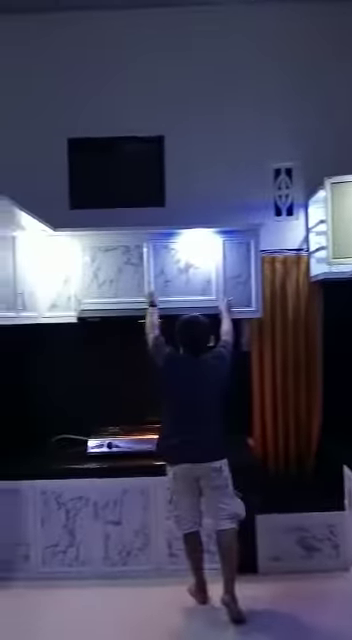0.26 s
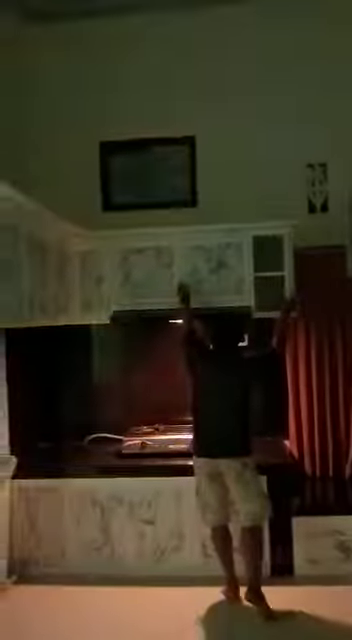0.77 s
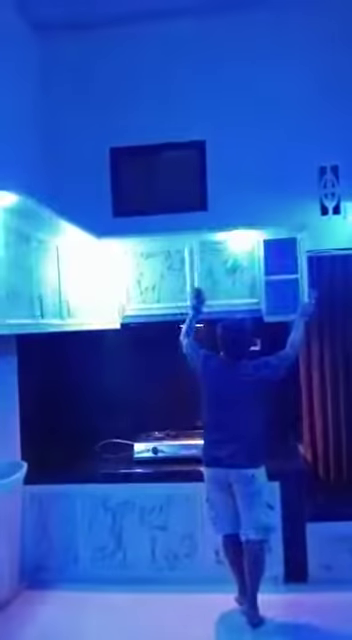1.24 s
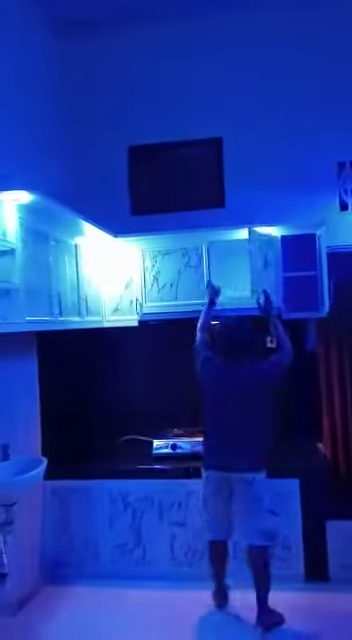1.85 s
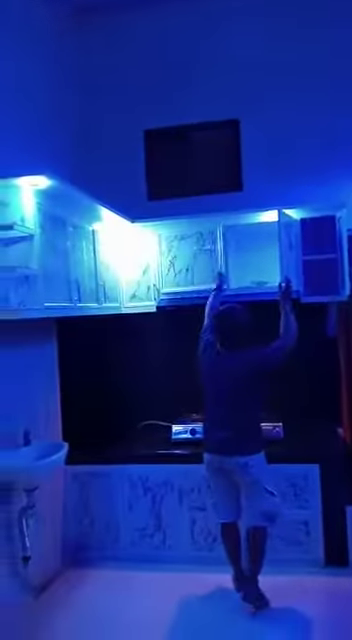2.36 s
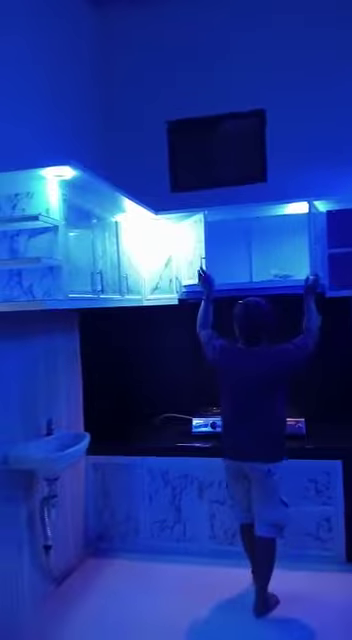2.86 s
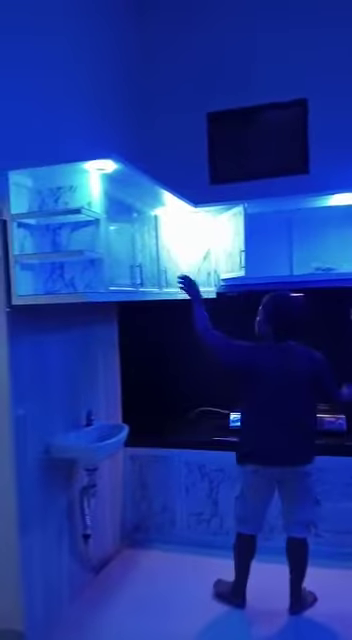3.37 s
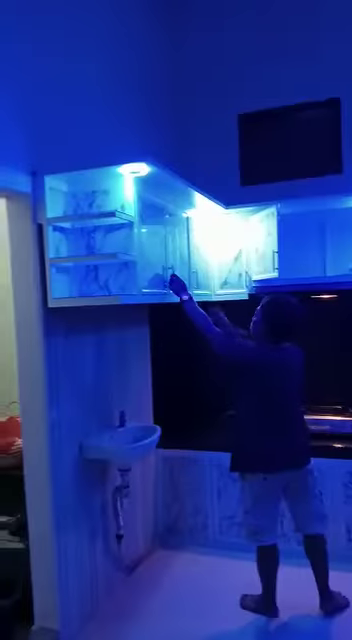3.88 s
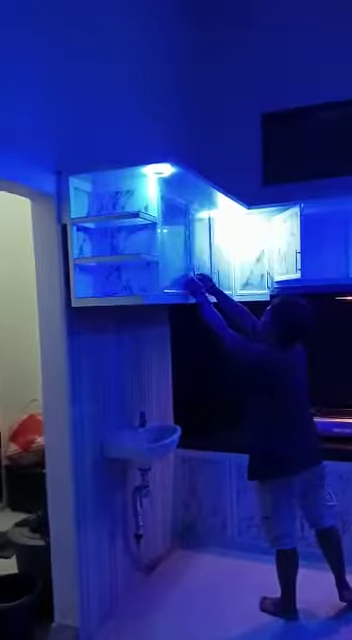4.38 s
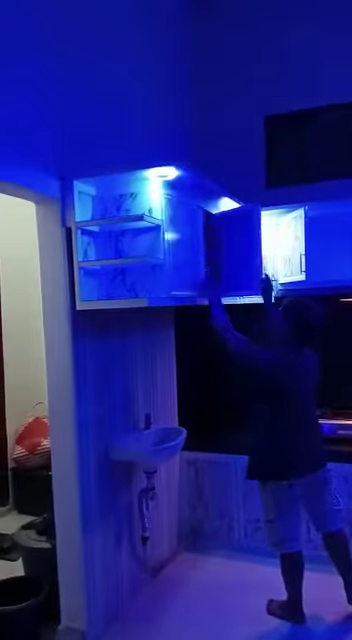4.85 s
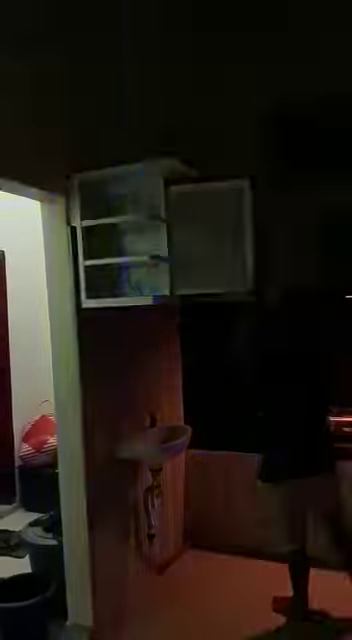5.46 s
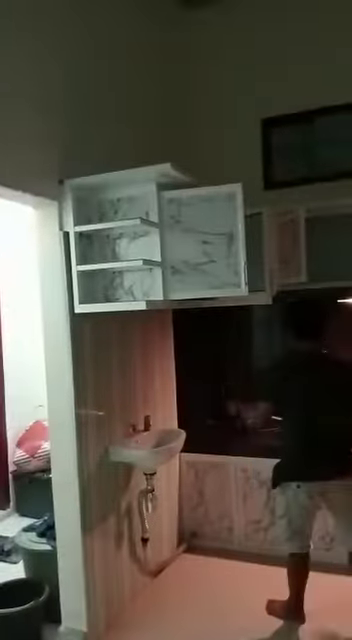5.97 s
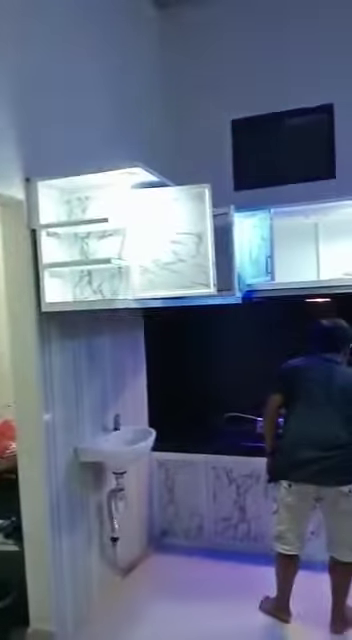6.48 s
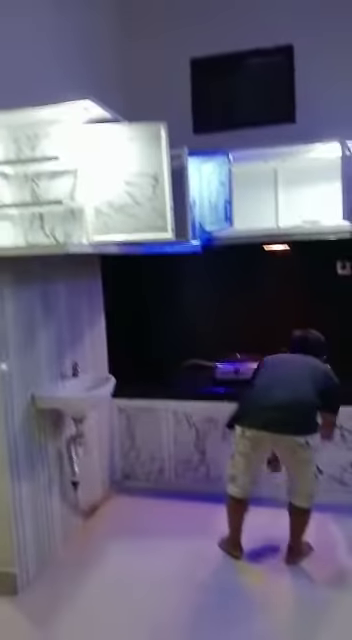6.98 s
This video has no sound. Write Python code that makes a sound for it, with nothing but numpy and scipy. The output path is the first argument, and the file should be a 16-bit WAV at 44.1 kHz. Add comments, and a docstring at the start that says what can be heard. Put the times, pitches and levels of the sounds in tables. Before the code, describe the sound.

A bare, tiled kitchen with about half a second of bright reverberation. Quiet air, a low motor hum, a faint wavering traffic drone and thin, high insect trills run throughout. Hands rub faintly at the start. At 0.48 s a door pops free and jangles, run together with a loud, dry switch snap close to the microphone at 0.53. Another door rattle at 0.98 meets the next, brighter snap at 1.0. Light ticks and a soft bump at 1.9-2.2 lead to a crisp catch pop at 2.37. A tiny tick at 3.4 and cushioned thuds at 3.75 and 3.94 follow. Doors clack and shudder open at 4.5 and, with more jangle, 4.93. Switches snap at 5.59 and, strongest, 6.18, each with a short wall echo. Soft bumps fall at 5.83 and 6.9; from 7.07 a low drawer is tugged, drumming and rasping until the cut.

```python
"""Doors pop off their catches, rattle and knock along a row of metal-framed kitchen cabinets in a bare, tiled room.
Closer to the microphone, wall switches snap the lights off and on; at the end a low drawer starts to slide.
Behind lie a humming motor, room air, a far traffic drone and thin night insects outside.
Knocks, snaps and rubbing are shaped noise, coloured by resonant bodies and blended with the room's answer;
the motor, traffic and insects are wavering sine tones, and the air is filtered noise."""
import sys
import numpy as np
from scipy import signal
from scipy.fft import rfft, irfft, next_fast_len
from scipy.io import wavfile
from scipy.ndimage import uniform_filter1d, map_coordinates

SR = 44100
rng = np.random.default_rng(int(sys.argv[2]) if len(sys.argv) > 2 else 0)


def digitize_waveform(pressure):
    """Quantize a signal to 16-bit integers and store it at the path in sys.argv[1].

    Rows of a 2-D input are taken as channels; values are limited to [-1, 1].
    """
    field = np.atleast_2d(pressure).T
    bounded = np.clip(field, -1, 1)
    quanta = np.round(bounded * 32767).astype(np.int16)
    wavfile.write(sys.argv[1], SR, quanta)


N = 318843
SPAN = 49152  # samples given to one knock or room answer
KNOCK_TIME = np.arange(SPAN) / SR  # [s]
KNOCK_HZ = np.fft.rfftfreq(SPAN, 1 / SR)
CLOCK = np.arange(N) / SR  # [s]
TOP_HZ = 15750  # the recorder's band limit

# Levels in the event tables are relative: trims, room and body filters in the functions also act on them.

# Room air, its broad colour: (frequency [Hz], spectral level [dB])
AIR_COLOUR = [(15, -60), (25, -57), (117, -15.5), (141, -22), (223, -13), (301, -14.5), (416, -16),
              (503, -12.5), (734, -22.5), (988, -21.5), (2910, -28), (3160, -30), (3820, -27), (4740, -29),
              (16000, -39.5)]
# Room air, resonances: (frequency [Hz], width [Hz], lift [dB])
AIR_MODES = [(61, 50, 12), (103, 30, 3.5), (300, 180, 4.1), (550, 42, 2.5), (9200, 1240, 9.3)]
# Steady lines of the motor: (frequency [Hz], middle level [dB])
MOTOR_LINES = [(148, -67), (495, -80)]
LOW_WAVES_DB = 3  # depth of the slow waves in the room's low end

# Far traffic drifting in and out: (start [s], time before the fall [s], middle pitch [Hz], middle level [dB])
TRAFFIC_SWELLS = [(-0.15, 0.37, 261.5, -60.5), (1.77, 0.16, 346, -65), (2.8, .13, 300, -63.5),
                  (3.22, .35, 310, -64)]
TRAFFIC_RISE_S, TRAFFIC_FALL_S, TRAFFIC_FLUTTER_DB = 0.072, 0.49, 1

# Insect chorus: (pitch [Hz], level against the chorus [dB], line width [Hz])
CHORUS_SINGERS = [(3135, -2, 50), (3240, 3.5, 14), (3532, -4, 30), (3950, -6, 240), (5350, -7, 300)]
CHORUS_DB, SONG_SWELL_DB = -85.5, 3.5
# Single insects over the chorus: (start [s], time before the fall [s], pitch [Hz], level [dB])
INSECT_CALLS = [(0.15, 0.36, 4600, -76.5), (1.25, 0.49, 3110, -74.5), (3.056, 0.38, 4650, -79),
                (5.25, 0.22, 4660, -80.5), (6.653, 0.43, 4590, -80)]
CALL_RISE_S, CALL_FALL_S, CALL_WIDTH_HZ = 0.095, 0.22, 44

# The tiled room's reverberation: (frequency [Hz], decay time t60 [s])
ROOM_DECAY = [(80, 0.99), (300, 0.56), (700, 0.55), (2000, 0.62), (4500, 0.62), (8000, 0.53), (11000, 0.49),
              (16000, 0.31)]

# Colour of rubbing hands and hinges: (frequency [Hz], spectral level [dB])
RUB_COLOUR = [(400, 2), (1500, -6.5), (3000, -10.5), (6500, -10.5), (9500, -7), (12000, -13.5),
              (15500, -13.5)]
# Rubs: (start [s], time before the fall [s], rasp level [dB])
RUB_STROKES = [(-0.06, 0.29, -61), (1.982, 0.42, -58.5), (3.553, 0.042, -69.5), (6.016, 0.098, -63)]
RUB_RISE_S, RUB_FALL_S = 0.041, 0.143
# Colour of the drawer on its runners: (frequency [Hz], spectral level [dB])
RUNNER_COLOUR = [(35, -40), (60, -3), (207, -7), (323, -6.5), (527, -9.5), (651, -10), (882, -13.5),
                 (1060, -19.5), (1910, -16.5), (2250, -26), (2580, -15), (2770, -21.5), (8320, -24.5),
                 (13900, -35), (16000, -42)]
# Resonances of the drawer: (frequency [Hz], width [Hz], lift [dB])
DRAWER_RESONANCES = [(306, 67, 7), (632.7, 26, 19.4), (853, 65, 13.8), (4600, 490, 5.1)]
# Tugs on the drawer, each adding to the slide: (start [s], carcass level [dB], runner level [dB])
DRAWER_TUGS = [(7.07, -47.5, -53), (7.163, -42, -53)]
TUG_RISE_S = 0.017

# Colour shared by all knocks: (frequency [Hz], spectral level [dB])
KNOCK_COLOUR = [(24, -50.5), (40, 0), (185, -6), (237, -7), (320, -4.5), (354, -8.5), (503, -14),
                (790, -18), (1270, -21.5), (1680, -20), (1950, -23.5), (2440, -24), (5310, -30),
                (9220, -25), (16000, -36.5)]
# Resonances shared by all knocks: (frequency [Hz], width [Hz], lift [dB])
KNOCK_RESONANCES = [(43.6, 23, -11.5), (147.7, 6.6, 8), (192.5, 3.4, 5.5), (249, 15, -3), (328, 16, 2.5),
                    (430, 64, 3.5), (506, 17, -2.5), (752, 31, -0.5), (1155, 15, 3), (1652, 22, 2),
                    (2464, 31, 7), (4420, 1200, 7.5), (6450, 2000, 7), (9190, 1500, 6)]
# Short, light taps and ticks, one perhaps a bump on the microphone: (time [s], treble level [dB],
# bass level [dB], middle level [dB], low note [Hz], upper note [Hz], rattle t60 [s])
LIGHT_TAPS = [(1.865, -50, -60.5, -61.5, 345, 3280, 0.0076), (2.234, -36.5, -43, -69, 149, 835, 0.021),
              (3.435, -63, -58, -74.5, 163, 1810, 0.0067)]
# Doors and drawers bumped softly: (time [s], catch level [dB], panel level [dB], frame level [dB],
# panel note [Hz], frame note [Hz], delay of the settling contact [s])
SOFT_BUMPS = [(2.204, -47.5, -45.5, -55, 190, 800, .018), (3.7531, -53, -46, -52, 223, 1100, .025),
              (3.941, -52.5, -36.5, -40.5, 259, 746, .014), (5.8259, -47.5, -49.5, -57, 390, 608, .025),
              (6.909, -55.5, -47.5, -52, 141, 680, 0.032)]
# Settling contact against the first (fittings, panel), and rattle t60 [s] of both
SETTLE_DB, SETTLE_PANEL_DB, BUMP_T60 = -3.5, -1, 0.034

# Colour of the wall switches: (frequency [Hz], spectral level [dB])
SWITCH_COLOUR = [(59, -61.5), (100, -22.5), (358, -1.5), (492, -3.5), (608, -9), (854, 3.5), (1390, -6),
                 (1650, -6.5), (2750, -5), (4570, -7.5), (7140, -3.5), (9610, 5), (12400, -9.5),
                 (15000, -9), (16000, -16)]
# Resonances shared by the switches: (frequency [Hz], width [Hz], lift [dB])
SWITCH_RESONANCES = [(232.2, 61, 1.5), (400.6, 90, 7), (605, 69, 14), (880, 100, -2), (1157, 27, 7),
                     (1680, 170, 6), (2099, 100, 2), (2300, 45, -6), (4567, 1500, 10.5), (6400, 340, 5),
                     (8260, 1400, 2), (13800, 2800, 3.5)]
# Switch snaps, lights off and on in turn: (time [s], click level [dB], plate level [dB], box level [dB],
# box note [Hz], spring note [Hz], spring lift [dB])
SWITCH_SNAPS = [(0.5338, -13.5, -31.5, -33.5, 610, 7700, 1), (1.0061, -9, -35.5, -30, 1700, 10900, 6),
                (5.5892, -13, -29, -29.5, 620, 10800, 0), (6.1806, -8, -33.5, -27.5, 850, 9470, 5.5)]
# The click's direct sound over the room's answer: (switching off [dB], switching on [dB])
CLICK_DIRECT_DB = (-3, -1.3)

# Doors pulled open: (time the catch lets go [s], grip's lead before it [s], swing's lag after it [s],
# grip level [dB], catch level [dB], carcass level [dB], panel level [dB], frame level [dB],
# hinge jangle level [dB], carcass note [Hz], catch note [Hz], panel note [Hz], frame note [Hz])
DOOR_PULLS = [(0.483, .018, 0.051, -40.5, -30.5, -36.5, -37, -30.5, -22, 145, 625, 426, 2650),
              (0.977, 0.094, 0.075, -48.5, -41, -39, -35, -32.5, -29, 292, 920, 252, 1705),
              (2.371, 0.054, .014, -46.5, -21.5, -35.5, -43, -56, -39.5, 281.5, 840, 139, 904),
              (4.5167, .09, .025, -47.5, -27.5, -36, -29.5, -31, -49.5, 409.6, 2100, 264, 872),
              (4.9314, 0.037, .036, -48, -24, -39, -21.5, -29, -25, 200, 2400, 336, 677)]
# Rattle t60 [s] of the three stages of a pull
GRIP_T60, RELEASE_T60, SWING_T60 = 0.36, 0.04, 0.058
# Parts of the grip against its own level
GRIP_CATCH_DB, GRIP_PANEL_DB, GRIP_FRAME_DB = 1, 0.5, -0.5
CATCH_FRAME_DB = -8  # frame against catch as the catch lets go
STRAIN_PANEL_HZ, STRAIN_FRAME_HZ = 340, 1540  # notes of a door strained against its catch


def amp(db):
    """Decibels to gain."""
    return 10 ** (np.asarray(db) / 20)


def unit(x):
    """x at rms 1."""
    return x / np.sqrt(np.mean(x ** 2) + 1e-20)


def along(points, hz):
    """(frequency, value) points read on a log frequency axis."""
    f, v = np.transpose(points)
    return np.interp(np.log(hz + 1), np.log(f + 1), v)


def colour(points, modes, hz):
    """Gain of a smooth spectrum with resonances standing on it."""
    lift_db = sum(db / (1 + (2 * (hz - f) / width) ** 2) for f, width, db in modes)
    return amp(along(points, hz) + lift_db)


def thirds(hz):
    """Gains that part bass, middle and treble."""
    low = 1 / (1 + (hz / 600) ** 6)
    high = 1 - 1 / (1 + (hz / 2800) ** 12)
    return np.sqrt([low, (1 - low) * (1 - high), high])


def causal(gain):
    """Minimum-phase response with this gain's shape: it rings only after it is struck."""
    cepstrum = irfft(np.log(np.maximum(gain / gain.max(), 1e-6)))
    # folding the cepstrum onto positive time gives the phase
    cepstrum[1:SPAN // 2] *= 2
    cepstrum[SPAN // 2 + 1:] = 0
    return np.exp(rfft(cepstrum))


def filtered(x, response):
    """x times a gain that depends on frequency."""
    size = next_fast_len(N + SR // 2)
    hz = np.fft.rfftfreq(size, 1 / SR)
    return irfft(rfft(x, size) * response(hz), size)[:N]


def add(track, s, sound):
    """Mix a sound in at time s, cut at the end of the track."""
    part = track[round(s * SR):][:len(sound)]
    part += sound[:len(part)]


def gate(s, length, rise, fall):
    """Level that rises from time s, holds, and falls once the length has passed."""
    opening = np.clip((CLOCK - s) / rise, 0, 1)
    closing = np.clip(1 - (CLOCK - s - length) / fall, 0, 1)
    return opening * closing


def wobble(rate):
    """A smooth random curve with this many knots a second."""
    return map_coordinates(rng.standard_normal(200), [CLOCK * rate], mode="wrap")


def background(air_db=-66):
    """Room air as coloured noise with a heaving low end, and the motor as unsteady low sine lines."""
    noise = rng.standard_normal(N)
    air = unit(filtered(noise, lambda hz: colour(AIR_COLOUR, AIR_MODES, hz)))
    rumble = filtered(air, lambda hz: thirds(hz)[0])
    waves = amp(LOW_WAVES_DB * wobble(9.9))
    bed = amp(air_db) * (air + rumble * (waves - 1))
    for hz, db in MOTOR_LINES:
        line = np.sin(2 * np.pi * hz * CLOCK + 0.88 * wobble(5))
        bed += amp(db + 2.2 * wobble(20)) * unit(line)
    return bed


def traffic(waver_hz=8):
    """A far drone that comes and goes, its pitch wavering and its level fluttering."""
    track = np.zeros(N)
    for s, length, hz, db in TRAFFIC_SWELLS:
        pitch = hz + waver_hz * wobble(24)
        tone = unit(np.sin(2 * np.pi * np.cumsum(pitch) / SR))
        flutter = amp(db + TRAFFIC_FLUTTER_DB * wobble(15))
        track += flutter * gate(s, length, TRAFFIC_RISE_S, TRAFFIC_FALL_S) * tone
    return track


def trill(hz, width):
    """A thin insect tone whose wandering phase widens its line."""
    drift = np.cumsum(rng.standard_normal(N)) * np.sqrt(np.pi * abs(width) / SR)
    return unit(np.sin(2 * np.pi * hz * CLOCK + uniform_filter1d(drift, size=200)))


def insects(lone_hz=4590, lone_db=-87, swell_rate=3.7):
    """Outside, a faint chorus swells and fades; now and then one singer calls over it."""
    singers = [(hz, CHORUS_DB + db, width) for hz, db, width in CHORUS_SINGERS]
    singers.append((lone_hz, lone_db, CALL_WIDTH_HZ))
    track = np.zeros(N)
    for hz, db, width in singers:
        track += amp(db + SONG_SWELL_DB * wobble(swell_rate)) * trill(hz, width)
    for s, length, hz, db in INSECT_CALLS:
        track += amp(db) * gate(s, length, CALL_RISE_S, CALL_FALL_S) * trill(hz, CALL_WIDTH_HZ)
    return track


def room_answer(build=0.0037, sparse=0.37, merge=0.12):
    """The room's answer, energy 1: uneven early echoes merge into a wash whose treble dies first."""
    echoes = rng.standard_normal(SPAN)
    spread = sparse * np.exp(-KNOCK_TIME / merge)
    echoes *= np.exp(spread * rng.standard_normal(SPAN) - spread ** 2)
    hz, t, z = signal.stft(echoes, SR, nperseg=256)
    decay = 1e-3 ** (t / along(ROOM_DECAY, hz)[:, None])
    wash = signal.istft(z * decay, SR, nperseg=256)[1][:SPAN]
    wash *= 1 - np.exp(-KNOCK_TIME / build)
    return wash / np.linalg.norm(wash)


def friction(response, rough):
    """Uneven tiny slips through a body and the room, rms 1."""
    grip = np.repeat(rng.standard_normal(N // 64 + 1), 64)[:N]  # holds for 64 samples at a time
    slips = rng.standard_normal(N) * np.exp(rough * grip)
    heard = amp(-3) * slips + signal.fftconvolve(slips, room_answer())[:N]
    return unit(filtered(heard, response))


def rubbing():
    """Hands and hinges rub faintly: friction noise raised by each stroke."""
    strokes = sum(amp(db) * gate(s, length, RUB_RISE_S, RUB_FALL_S) for s, length, db in RUB_STROKES)
    return strokes * friction(lambda hz: colour(RUB_COLOUR, [], hz), rough=1.0)


def drawer():
    """The low drawer rasps on its runners (treble) and drums its carcass (bass and middle)."""
    def body(hz):
        return colour(RUNNER_COLOUR, DRAWER_RESONANCES, hz)

    carcass = friction(lambda hz: body(hz) * np.hypot(*thirds(hz)[:2]), rough=0.57)
    runner = friction(lambda hz: body(hz) * thirds(hz)[2], rough=0.78)
    track = np.zeros(N)
    for s, carcass_db, runner_db in DRAWER_TUGS:
        slide = np.clip((CLOCK - s) / TUG_RISE_S, 0, 1)  # once tugged it keeps sliding
        track += slide * (amp(carcass_db) * carcass + amp(runner_db) * runner)
    return track


def contact(half_t60, rough):
    """Spectrum of a burst of tiny collisions, about equally strong at all frequencies."""
    age = np.log(1000) * KNOCK_TIME / max(half_t60, 1e-3)
    swell = np.sqrt(age * np.exp(-age))  # falls 60 dB in about twice half_t60
    burst = rfft(rng.standard_normal(SPAN) * np.exp(rough * rng.standard_normal(SPAN)) * swell)
    flat = irfft(burst / (np.abs(burst) + 1e-12))
    return rfft(flat * swell)


def strike(spectrum, gain):
    """A contact heard through a body, at rms 1 over its loudest 40 ms."""
    sound = irfft(spectrum * causal(gain))
    return sound / np.sqrt(uniform_filter1d(sound ** 2, size=1764).max())


def knocks(contacts, direct_db, note_db, ring_db, hollow_db, panel_q, dulling, boom_db, boom_s, rough,
           catch_db=-11, frame_db=-1, panel_db=-3):
    """Each knock has a catch-like treble scrape, a frame-like middle rattle and a panel-like boom."""
    track = np.zeros(N)
    bass, middle, treble = thirds(KNOCK_HZ)
    octaves = np.log2(np.clip(KNOCK_HZ, 500, 6000) / 1000)  # from 1 kHz
    for s, catch, panel, frame, panel_hz, frame_hz, rattle_t60 in contacts:
        heard = rfft(room_answer(build=0.0014)) + amp(direct_db)
        blow = contact(rattle_t60 / 2, rough) * heard
        notes = [(panel_hz, 45, note_db), (frame_hz, 90, ring_db), (frame_hz, frame_hz / 2, hollow_db)]
        body = colour(KNOCK_COLOUR, KNOCK_RESONANCES + notes, KNOCK_HZ)
        # a soft, cushioned blow is dull in every part
        body *= amp(dulling * min(catch - panel, 0) * octaves)
        # the panel radiates little far from its note
        flex = 1 / np.hypot(1, panel_q * (KNOCK_HZ / panel_hz - panel_hz / (KNOCK_HZ + 1)))
        add(track, s, amp(catch + catch_db) * strike(blow, body * treble))
        add(track, s, amp(frame + frame_db) * strike(blow, body * middle))
        add(track, s, amp(panel + panel_db) * strike(blow, body * bass * flex))
        # the panel's main mode swings up, peaks after boom_s and dies away
        swing = KNOCK_TIME / boom_s * np.exp(1 - KNOCK_TIME / boom_s)
        mode = unit(np.sin(2 * np.pi * panel_hz * KNOCK_TIME))
        add(track, s, amp(panel + boom_db) * swing * mode)
    return track


def taps():
    """Short, light taps and ticks, one perhaps a bump on the microphone."""
    return knocks(LIGHT_TAPS, direct_db=-4.5, note_db=0, ring_db=-2, hollow_db=11.5, panel_q=1.3,
                  dulling=0.2, boom_db=3, boom_s=0.012, rough=0.73)


def bumps():
    """A cushioned door or drawer touches its frame, then settles with a weaker, duller thud."""
    contacts = []
    for s, catch, panel, frame, panel_hz, frame_hz, settle in SOFT_BUMPS:
        contacts.append((s, catch, panel, frame, panel_hz, frame_hz, BUMP_T60))
        contacts.append((s + settle, catch + SETTLE_DB, panel + SETTLE_PANEL_DB, frame + SETTLE_DB,
                         panel_hz, frame_hz, BUMP_T60))
    return knocks(contacts, direct_db=-11.5, note_db=6.5, ring_db=5, hollow_db=2.5, panel_q=1.12,
                  dulling=0.39, boom_db=-1.5, boom_s=0.01, rough=1.13)


def switches(snap_half_t60=0.0055, box_direct_db=-9, echo_s=0.049, echo_db=-14,
             click_db=-11, box_db=0, plate_db=-2):
    """A sprung rocker flips close by: it clicks, its box and plate ring, and one hard wall echoes distinctly."""
    track = np.zeros(N)
    bass, middle, treble = thirds(KNOCK_HZ)
    wall = amp(echo_db) * np.exp(-2j * np.pi * KNOCK_HZ * echo_s)  # a pure delay
    for turn, (s, click, plate, box, box_hz, spring_hz, spring_lift) in enumerate(SWITCH_SNAPS):
        snap = contact(snap_half_t60, rough=0.19)
        room = rfft(room_answer(build=0.0031, sparse=0.6)) + wall
        notes = [(box_hz, 130, 5), (spring_hz, 1100, spring_lift)]
        body = colour(SWITCH_COLOUR, SWITCH_RESONANCES + notes, KNOCK_HZ)
        near_click = snap * (room + amp(CLICK_DIRECT_DB[turn % 2]))
        knock = snap * (room + amp(box_direct_db))
        add(track, s, amp(click + click_db) * strike(near_click, body * treble))
        add(track, s, amp(box + box_db) * strike(knock, body * middle))
        add(track, s, amp(plate + plate_db) * strike(knock, body * bass))
    return track


def doors():
    """A hand strains the door, the catch lets go and jolts the carcass, then the freed panel shudders."""
    contacts = []
    for (s, lead, lag, grip, catch, carcass, panel, frame, jangle,
         carcass_hz, catch_hz, panel_hz, frame_hz) in DOOR_PULLS:
        contacts.append((s - lead, grip + GRIP_CATCH_DB, grip + GRIP_PANEL_DB, grip + GRIP_FRAME_DB,
                         STRAIN_PANEL_HZ, STRAIN_FRAME_HZ, GRIP_T60))
        contacts.append((s, catch, carcass, catch + CATCH_FRAME_DB, carcass_hz, catch_hz, RELEASE_T60))
        contacts.append((s + lag, jangle, panel, frame, panel_hz, frame_hz, SWING_T60))
    return knocks(contacts, direct_db=-11.5, note_db=3, ring_db=7.5, hollow_db=0, panel_q=1,
                  dulling=0.3, boom_db=-5, boom_s=0.021, rough=1.18)


def scene():
    """Everything, far and near, reaches one microphone."""
    far = background() + traffic() + insects()
    room = rubbing() + drawer() + taps() + bumps() + doors()
    return (far + room + switches())[None]


def record(dry):
    """The recorder cuts steeply above its band limit."""
    return filtered(dry[0], lambda hz: 1 / np.sqrt(1 + (hz / TOP_HZ) ** 600))[None]


dry = scene()
out = record(dry)
digitize_waveform(out)
```